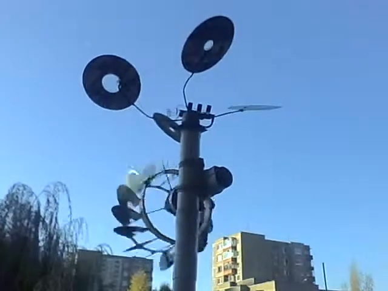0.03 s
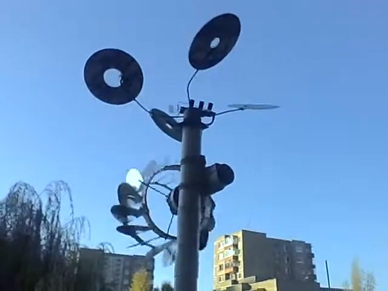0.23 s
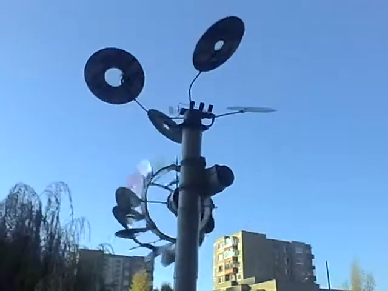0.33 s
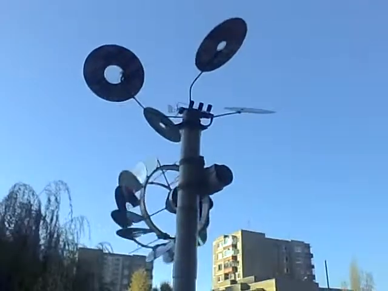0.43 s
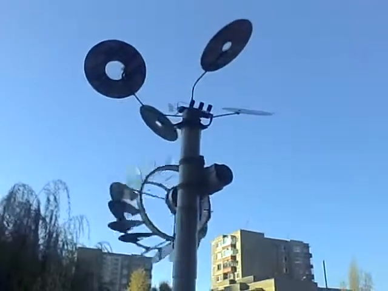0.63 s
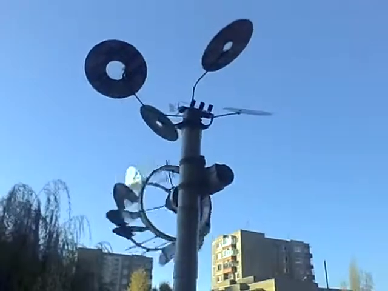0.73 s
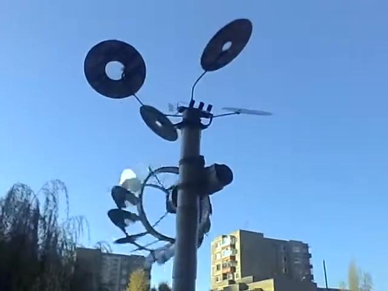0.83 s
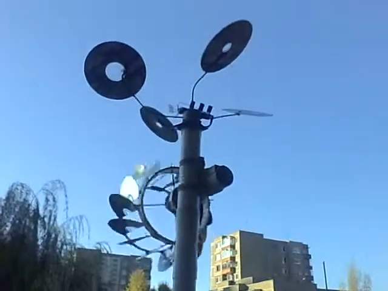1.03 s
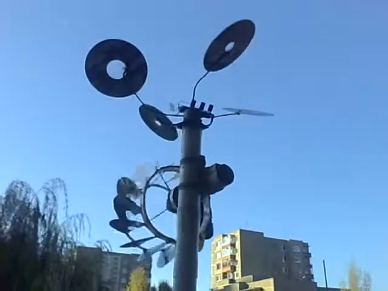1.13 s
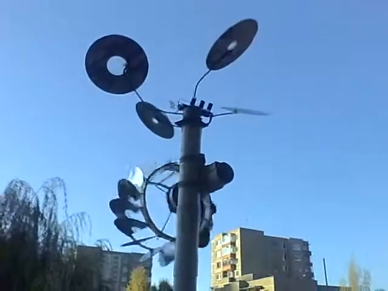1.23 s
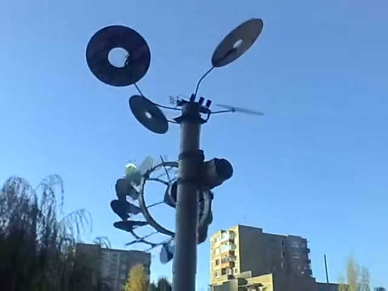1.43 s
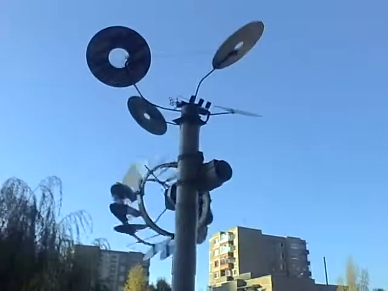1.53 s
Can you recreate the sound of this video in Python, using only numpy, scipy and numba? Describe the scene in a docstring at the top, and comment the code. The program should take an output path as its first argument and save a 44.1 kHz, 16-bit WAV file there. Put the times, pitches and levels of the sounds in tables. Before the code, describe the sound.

Light wind buffets the microphone outdoors with a low, uneven rumble that builds and sinks. Far traffic, a thin engine whine and a faint hiss continue underneath, and two quiet, distant taps sound as the gust fades.

```python
"""A soft wind rumble swells and sinks as gusts buffet a small microphone in an open town square.
Single eddies (little whirls of air) thump on the microphone's opening, the harder ones brighter.
Behind the wind, far engines make a wavering hum and whine, and distant traffic rolls on.
An even hiss lies under it all, and two faint taps come just after the one-second mark."""
import sys
import numpy as np
from scipy import signal
from scipy.fft import rfft, irfft
from scipy.io import wavfile
from scipy.ndimage import uniform_filter1d
from numba import njit

SR = 44100
rng = np.random.default_rng(int(sys.argv[2]) if len(sys.argv) > 2 else 0)


def master_out(mix):
    """Clip the mix to full scale and print it as 16-bit PCM to the path in sys.argv[1]."""
    frames = np.transpose(np.atleast_2d(mix))
    ceiling = np.clip(frames, -1, 1)
    pcm = np.round(ceiling * 32767).astype(np.int16)
    wavfile.write(sys.argv[1], SR, pcm)


N = 70560  # 1.6 seconds


def undb(db):
    """Turn decibels (dB) into a number to multiply a sound by."""
    return 10 ** (np.asarray(db) / 20)


def unit(x):
    """Scale a signal so that its average strength (root mean square) is 1."""
    return x / np.sqrt(np.mean(x ** 2))


def walk(rate):
    """A smooth random wander, about 1 in size, that changes about rate times a second."""
    hz = np.fft.rfftfreq(2 * N, 1 / SR)
    slow_spectrum = rfft(rng.standard_normal(2 * N)) * np.exp(-(hz / rate) ** 2)
    return unit(irfft(slow_spectrum))[:N]


def coloured(points):
    """Noise of strength 1, its tone shaped by rows of frequency in Hz and relative level in dB."""
    point_hz, point_db = np.array(points).T
    hz = np.fft.rfftfreq(N, 1 / SR)
    gain = undb(np.interp(np.log(hz + 1), np.log(point_hz), point_db))
    return unit(irfft(rfft(rng.standard_normal(N)) * gain, N))


def butter(x, hz, kind, order=2):
    """Keep what lies below hz ("low"), above it ("high") or between two frequencies ("band")."""
    return signal.sosfilt(signal.butter(order, hz, kind, fs=SR, output="sos"), x)


@njit
def lowpass(x, hz, damping):
    """Keep what lies below a moving cutoff, hz; less damping lets the filter ring more."""
    out, band_state, low_state = np.empty(len(x)), 0., 0.
    for i in range(len(x)):
        step = np.tan(np.pi * hz[i] / SR)
        band = (band_state + step * (x[i] - low_state)) / (1 + step * (step + damping))
        out[i] = low_state + step * band
        band_state, low_state = 2 * band - band_state, 2 * out[i] - low_state
    return out


def steady(x, span_s):
    """Even out swells slower than about span_s seconds, leaving a strength near 1."""
    size = max(int(span_s * SR), 2)
    local_power = uniform_filter1d(uniform_filter1d(x ** 2, size), size)
    return x / np.sqrt(local_power + 1e-18)


def wind():
    """Air rumbles on the microphone's opening: a stronger breeze sheds faster, harder eddies."""
    # The strength of the breeze. Each row: time in seconds, relative level in dB.
    gusts = [(0, -57), (.09, -62.5), (0.136, -51), (.19, -61.5), (.28, -56), (0.381, -52), (0.529, -60),
             (0.599, -53), (0.644, -54.5), (.71, -43.5), (.8, -48.5), (0.872, -49), (0.918, -54.5),
             (1.03, -50.5), (1.169, -52), (1.281, -54.5), (1.381, -58), (1.6, -58.5)]
    gust_db = np.interp(np.arange(N) / SR, *np.array(gusts).T)
    lowest_hz, flutter_hz, sway_hz = 13.8, 222, 41.6
    cutoff_hz = np.clip(69 * 2 ** ((gust_db + 47.5) / 18), 10, 2000)  # doubles with every 18 dB of gust
    eddies = lowpass(rng.standard_normal(N), cutoff_hz, damping=1.1)
    eddies = lowpass(eddies, cutoff_hz * 1.93, damping=0.83)
    rumble = steady(butter(eddies, lowest_hz, "high"), span_s=0.013)
    fine_eddies = butter(rng.standard_normal(N), flutter_hz, "low")
    flutter = unit(butter(fine_eddies, lowest_hz, "high"))
    slow_pressure = butter(rng.standard_normal(N), sway_hz, "low", order=4)
    sway = steady(butter(slow_pressure, lowest_hz, "high"), span_s=0.014)
    return undb(gust_db + 2) * (rumble + undb(-12.5) * flutter + undb(1) * sway)


def hum():
    """Far engines hum; the moving air smears the pitch of each tone and makes its level waver."""
    # The engine tones. Each row: pitch in Hz, relative level in dB, pitch wander in Hz,
    # swell in dB per second (below zero, the tone fades).
    engine_tones = [(154.4, -68, 14, -2.5), (198.1, -63, 2.5, 7.5), (253, -70.5, 3.4, -5.5),
                    (499.3, -65.5, 2.6, 0), (521.7, -65.5, 7, 5.5), (622.4, -66.5, 4.3, -1),
                    (644, -73.5, 6, 0.5), (686.6, -67, 7, 2.5), (711, -63, 8.2, 1),
                    (1012.7, -70.5, 4.5, -9), (1195, -67.5, 14, -1.5), (1393, -78.5, 6.3, -6.5),
                    (1552, -78, 7.1, 0), (2226, -80.5, 14, -1.5), (2473, -82, 10, 1.5)]
    t, out = np.arange(N) / SR, 0
    for hz, db, wander_hz, swell in engine_tones:
        pitch_hz = hz + wander_hz * walk(rate=22)
        phase = 2 * np.pi * (np.cumsum(pitch_hz) / SR + rng.random())
        waver_db = 1.5 * walk(rate=9)
        out = out + undb(db) * unit(np.sin(phase) * undb(swell * t + waver_db))
    return undb(-1) * out


def whine():
    """One far engine tone comes and goes; echoes off the house fronts make it flutter and break up."""
    # How loud the whine is. Each row: time in seconds, level in dB.
    whine_levels = [(0, -61), (.044, -53), (.2, -58), (.34, -56), (.45, -61.5), (.53, -57), (.58, -64),
                    (.66, -58), (.72, -62), (1.28, -60.5), (1.42, -64.5), (1.6, -67)]
    level_db = np.interp(np.arange(N) / SR, *np.array(whine_levels).T)
    pitch_hz = 759 + 3 * walk(rate=10)
    phase = 2 * np.pi * np.cumsum(pitch_hz) / SR
    echoes = walk(rate=21.5) * np.sin(phase) + walk(rate=21.5) * np.cos(phase)
    return undb(level_db) * unit(np.sin(phase) + undb(-8) * echoes)


def traffic():
    """Far tyres and engines blend into one dull roll whose level flickers slightly."""
    # The tone of the traffic. Each row: frequency in Hz, relative level in dB.
    traffic_spectrum = [(25, 0), (60, -13), (110, -7), (220, -5.5), (330, -6), (440, -10), (560, -4.5),
                        (700, -3.5), (830, -6.5), (950, -3), (1080, -11), (1450, -10.5), (1800, -18),
                        (2400, -22), (3200, -24.5), (4200, -32), (7000, -53)]
    level_db = -55 + 0.22 * walk(rate=18)
    return undb(level_db) * coloured(traffic_spectrum)


def hiss():
    """A faint, even hiss, strongest near 6400 Hz."""
    # The tone of the hiss. Each row: frequency in Hz, relative level in dB.
    hiss_spectrum = [(1000, -5), (4000, -6.5), (5200, 3.5), (6400, 6), (6800, -0.5), (7400, -12),
                     (8000, -27.5)]
    return undb(-74.5) * coloured(hiss_spectrum)


def buffets():
    """Each eddy thumps: its core is a brief dip in pressure, wrapped in a swirl of rough air."""
    # Eddies striking the microphone. Each row: time of the peak in seconds, thump level in dB,
    # length in seconds, swirl level in dB, brightness (the swirl's upper edge) in Hz.
    eddy_strikes = [(0.114, -51, 0.018, -43, 221), (.151, -31.5, 0.023, -49, 145),
                    (0.416, -53, 0.034, -49.5, 191.5), (0.57, -41, .02, -35.5, 152.3),
                    (0.611, -41.5, 0.019, -40.5, 172), (0.667, -29.5, 0.015, -45, 238),
                    (0.686, -25, 0.0066, -42.5, 653), (0.698, -26, 0.024, -34, 217),
                    (0.737, -38.5, 0.016, -35.5, 217), (0.761, -27, .016, -36, 164.5),
                    (.794, -33, 0.016, -54, 138), (0.848, -30, 0.026, -34, 193.6),
                    (0.942, -39, 0.018, -41, 174), (.967, -28.5, 0.027, -47, 162),
                    (1.124, -35.5, 0.017, -43.5, 170), (1.164, -50, 0.012, -46.5, 152),
                    (1.208, -33.5, 0.015, -47.5, 140), (1.239, -44, 0.011, -46.5, 140),
                    (1.272, -35, 0.01, -47.5, 240), (1.34, -40, 0.012, -55, 160),
                    (1.42, -48, .016, -46, 104)]
    core_share, low_edge_share = 0.21, 0.35  # shares of the length and of the brightness
    t, out = np.arange(N) / SR, 0
    for peak_s, thump_db, length_s, swirl_db, top_hz in eddy_strikes:
        core = -np.exp(-((t - peak_s) / (core_share * length_s)) ** 2)
        swirl = butter(rng.standard_normal(N), top_hz, "low", order=6)
        swirl = butter(swirl, top_hz * low_edge_share, "high")
        burst = steady(swirl, span_s=0.0085) * np.exp(-2 * ((t - peak_s) / length_s) ** 2)
        out = out + undb(thump_db) * core + undb(swirl_db) * burst
    return butter(out, 10, "high", order=1)


def taps():
    """Two faint, distant taps, each a short, dry knock with a soft tick on top."""
    # The taps. Each row: start in seconds, level in dB, centre of the knock in Hz.
    tap_events = [(1.039, -46, 840), (1.112, -46, 910)]
    tick_decay_s, knock_decay_s = 0.003, 0.0065
    top_hz, width_octaves = 2300, 0.41
    t, out = np.arange(N) / SR, 0
    for start_s, db, centre_hz in tap_events:
        age = np.maximum(t - start_s, 0)
        tick = unit(butter(rng.standard_normal(N), top_hz, "low")) * np.exp(-age / tick_decay_s)
        edges_hz = centre_hz * 2 ** (width_octaves * np.array([-.5, .5]))
        knock_noise = steady(butter(rng.standard_normal(N), edges_hz, "band"), span_s=0.0045)
        knock = knock_noise * np.exp(-age / knock_decay_s)
        out = out + undb(db) * (t > start_s) * (knock + undb(-14) * tick)
    return butter(out, top_hz, "low")


def scene():
    """Mix into one channel: wind close by, the town far off, hiss under both."""
    return (wind() + buffets() + hum() + whine() + traffic() + taps() + hiss())[None]


def record(dry):
    """A steep filter cuts the treble off the whole sound."""
    top_hz = 7650
    return signal.sosfilt(signal.ellip(10, .2, 70, top_hz, fs=SR, output="sos"), dry)


dry = scene()
out = record(dry)
master_out(out)
```